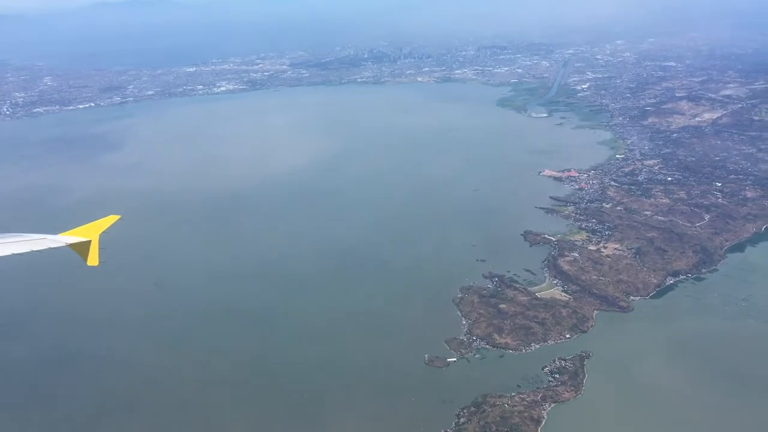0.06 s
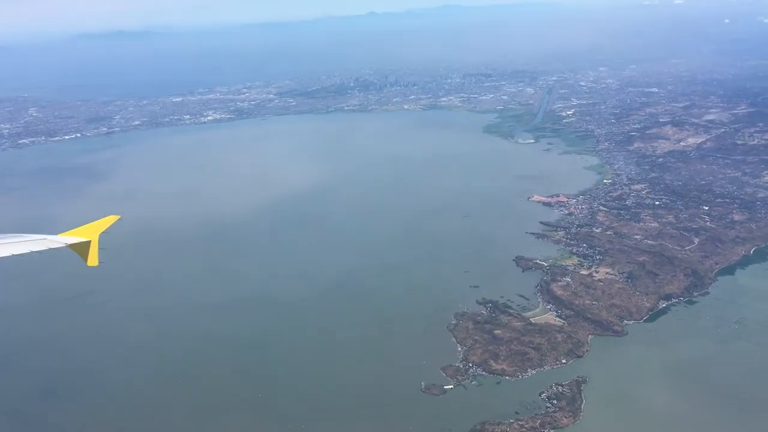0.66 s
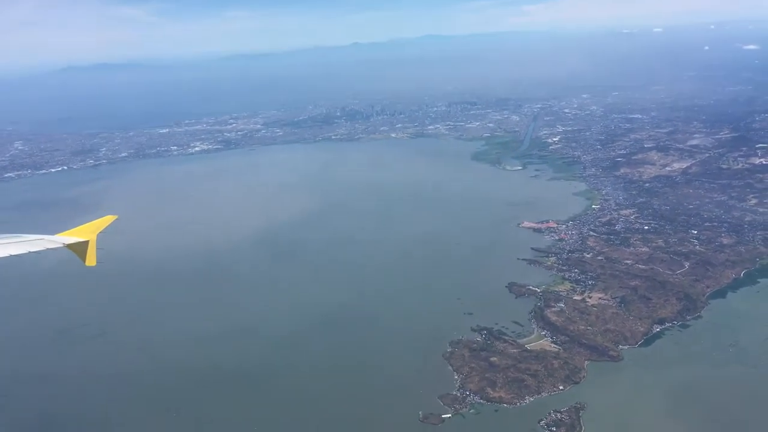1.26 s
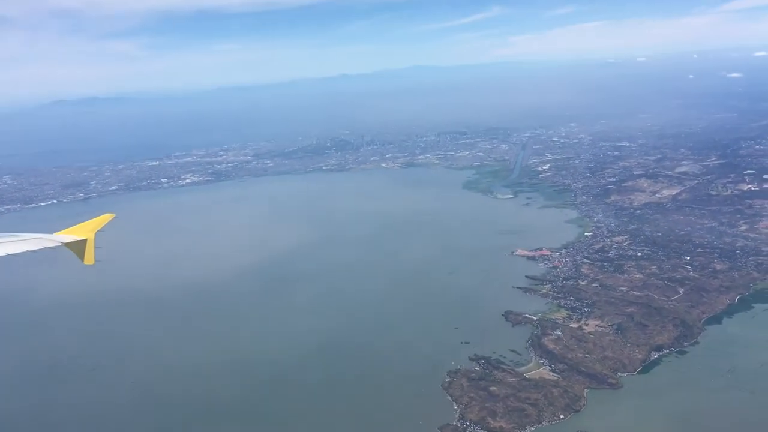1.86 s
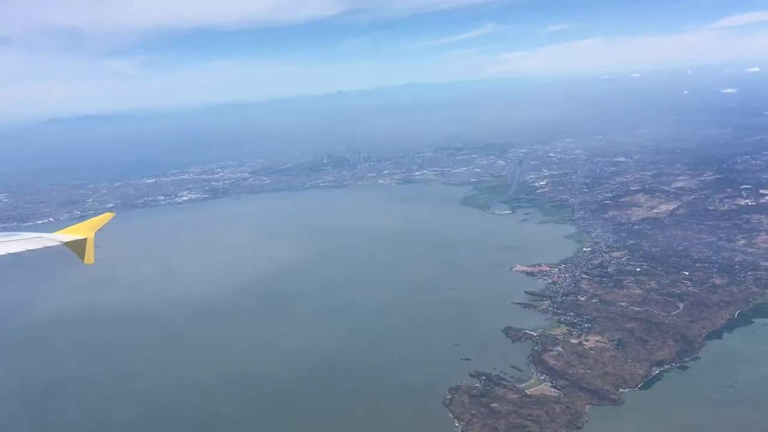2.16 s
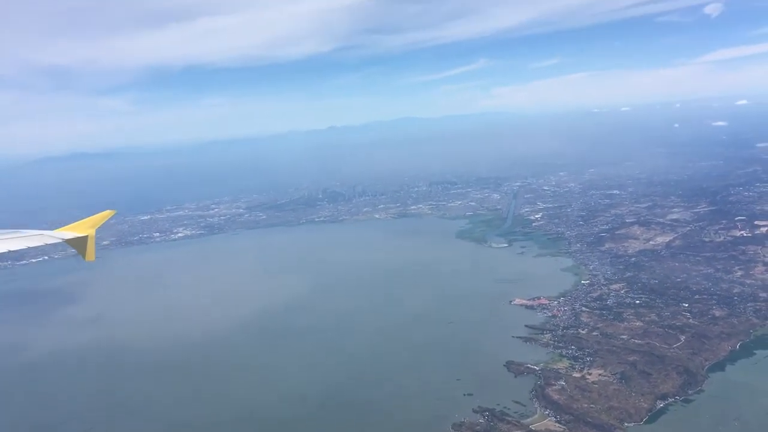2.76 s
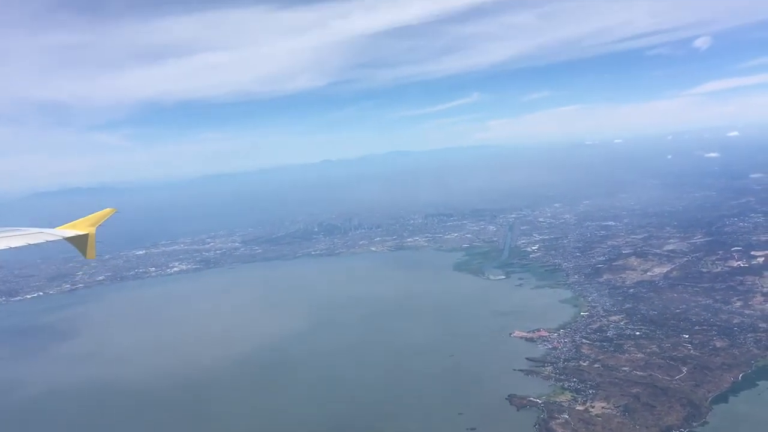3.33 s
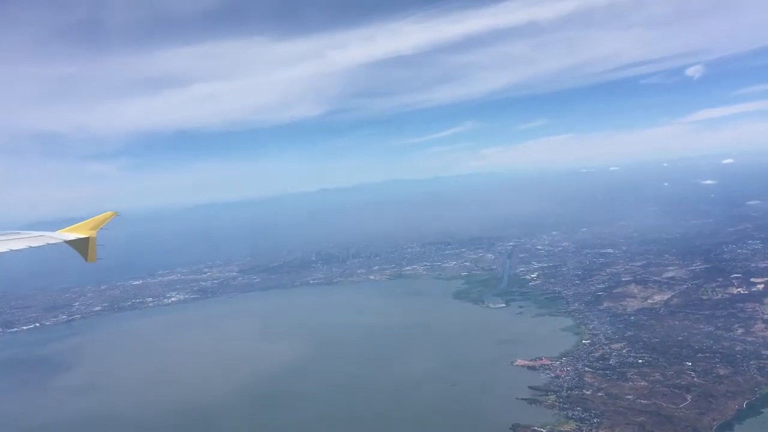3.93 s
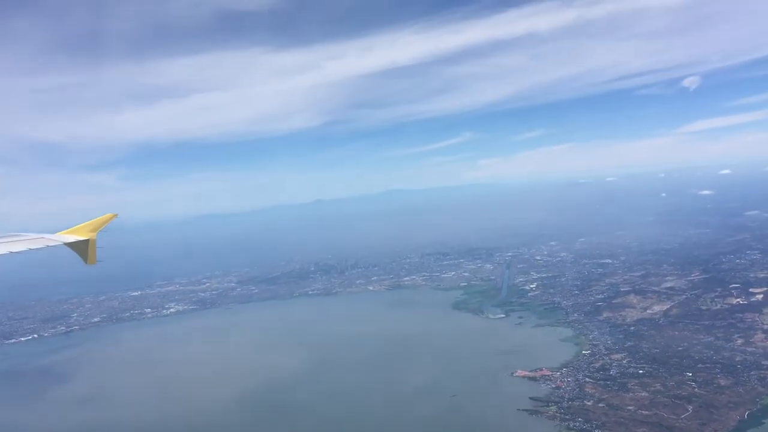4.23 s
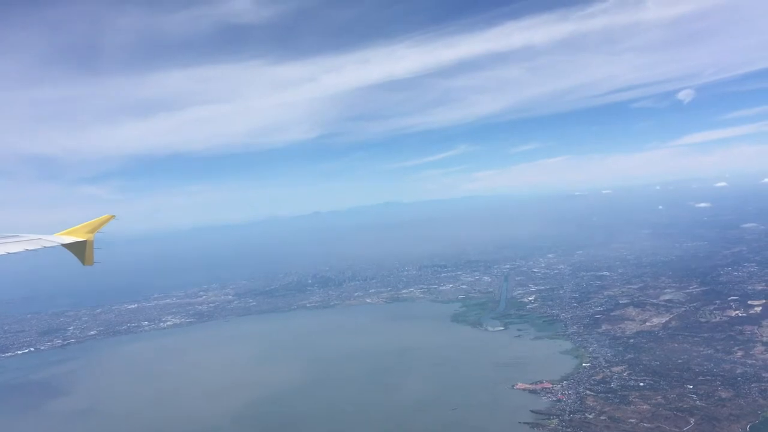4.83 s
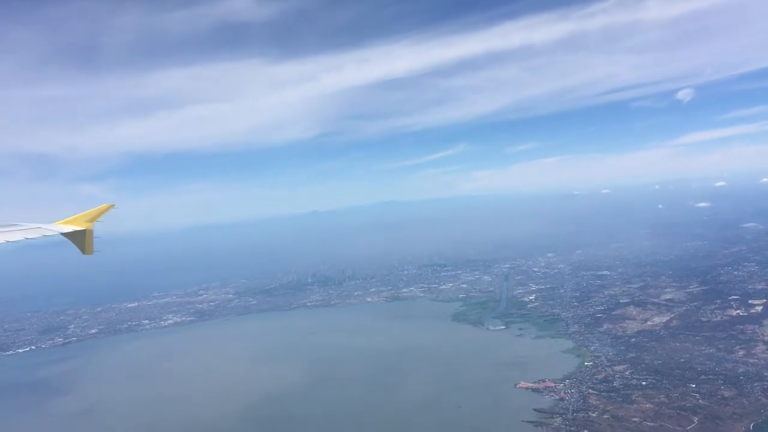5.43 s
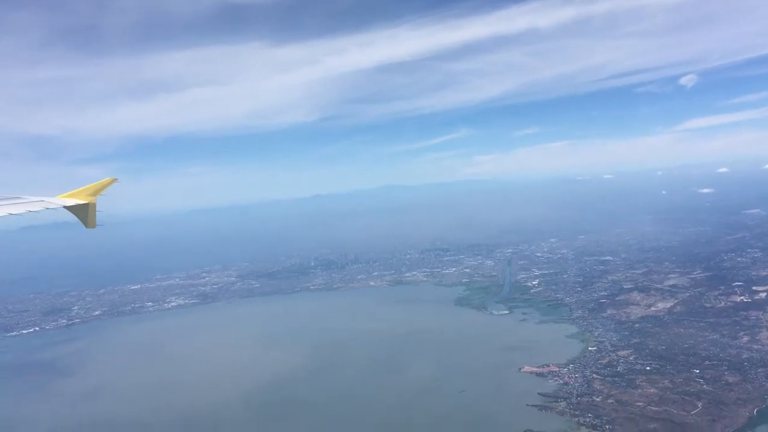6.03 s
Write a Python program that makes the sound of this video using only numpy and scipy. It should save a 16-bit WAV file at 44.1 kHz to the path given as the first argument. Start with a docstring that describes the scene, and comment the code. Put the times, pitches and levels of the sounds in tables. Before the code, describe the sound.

Inside a flying airliner, rushing air and humming engines make a constant low rumble under faint vent hiss.

```python
"""Air rushing along an airliner's fuselage rumbles through the wall at a window seat.
Under that deep bed the engine shafts hum, edging up in pitch, and the engine roar drones
in one cabin resonance that swells three times. On top, the vents hiss and ring in their ducts
and one nozzle whistles softly. A few faint, crisp clicks sound somewhere in the cabin."""
import sys
import numpy as np
from scipy.fft import rfft, irfft, next_fast_len
from scipy.io import wavfile
from scipy.ndimage import map_coordinates

SR = 44100
rng = np.random.default_rng(int(sys.argv[2]) if len(sys.argv) > 2 else 0)


def digitize_waveform(pressure):
    """Quantize a signal to 16-bit integers and store it at the path in sys.argv[1].

    Rows of a 2-D input are taken as channels; values are limited to [-1, 1].
    """
    field = np.atleast_2d(pressure).T
    bounded = np.clip(field, -1, 1)
    quanta = np.round(bounded * 32767).astype(np.int16)
    wavfile.write(sys.argv[1], SR, quanta)


N = 268569

# cues for the faint clicks: start_s, level_db, attack_s
CLICK_CUES = [(3.331, -61, .003), (3.729, -66, .002), (4.005, -59, .002), (4.711, -52.3, .006),
              (5.252, -55.5, .003), (5.328, -52.5, .007), (5.760, -59.5, .004)]
# bright colour of a click: frequency_hz, relative_db
CLICK_COLOUR = [(1500, -32), (4800, -4), (5400, 3), (8800, -1), (10200, -9), (11800, -8), (15500, -14)]
# colour of the vent hiss: frequency_hz, relative_db
HISS_COLOUR = [(600, -19), (1800, -5), (2400, 1.5), (3300, 0), (4500, -7.5), (4950, -14.5), (5300, -13),
               (6900, -12.5), (7700, -17), (9400, -17.5), (10400, -26.5), (11200, -25), (13800, -31.5),
               (15800, -27)]
# resonances of the air ducts: pitch_hz, width_hz, level_db
DUCT_MODES = [(2040, 120, -66.5), (2203, 50, -73), (2368, 50, -68.5), (2483, 70, -67), (2563, 45, -67.5),
              (2807, 150, -66.5), (3304, 20, -74), (3610, 390, -72), (4200, 40, -79), (4510, 70, -79),
              (6394, 100, -85.5), (8400, 350, -82.5), (8920, 300, -76.5), (12150, 900, -84.5)]
# partials of the engine hum: shaft_order, level_db
HUM_PARTIALS = [(1, -32), (2, -35)]
# swells of the engine drone: peak_s, rise_db
DRONE_SWELLS = [(2.55, 3), (3.9, 5.5), (4.8, 7)]
# boomy low resonances of the cabin: pitch_hz, width_hz, level_db
CABIN_MODES = [(51.8, 11, -37.5), (79.3, 12.2, -33), (125.8, 9.9, -37.5), (182.3, 12, -36),
               (229.3, 22, -35), (314.5, 22, -42), (360.4, 24, -47.5)]
# dark colour of the airflow through the wall: frequency_hz, relative_db
RUMBLE_COLOUR = [(18, -34), (30, -27), (46, -3), (105, -2), (230, -2.5), (315, -7), (400, -17),
                 (530, -26.5), (1000, -36.5), (1400, -44), (1850, -49.5), (4000, -79)]


def amp(db):
    """Decibels to gain."""
    return 10 ** (np.asarray(db) / 20)


def unit(x):
    """x at rms 1."""
    return x / np.sqrt(np.mean(x ** 2) + 1e-20)


def wobble(rate):
    """A smooth random curve, rate knots a second."""
    return map_coordinates(rng.standard_normal(N // 100), [np.arange(N) * rate / SR], mode="mirror")


def ramp(start_s, length_s):
    """A rise from 0 to 1 that then holds."""
    return np.clip((np.arange(N) / SR - start_s) / length_s, 0, 1)


def filtered(x, response):
    """x through an EQ curve, given as gain against frequency."""
    size = next_fast_len(N + SR // 2)
    return irfft(rfft(x, size) * response(np.fft.rfftfreq(size, 1 / SR)), size)[:N]


def coloured_noise(colour):
    """Noise of rms 1, shaped by (frequency_hz, relative_db) points."""
    points_hz, db = np.transpose(colour)
    curve = lambda hz: amp(np.interp(np.log(hz + 1), np.log(points_hz), db))
    return unit(filtered(rng.standard_normal(N), curve))


def ringing(pitch_hz, width_hz):
    """Noise of rms 1 in one resonance with steep skirts."""
    peak = lambda hz: (1j * hz * width_hz / (pitch_hz ** 2 - hz ** 2 + 1j * hz * width_hz)) ** 2
    return unit(filtered(rng.standard_normal(N), peak))


def resonances(modes):
    """A bank of resonances kept ringing by turbulence."""
    return sum(amp(db) * ringing(pitch_hz, width_hz) for pitch_hz, width_hz, db in modes)


def clicks(scratch_db=2.0, t60_s=.18):
    """The cabin smears each click into a short, bright, scratchy burst."""
    t = np.arange(N) / SR
    envelope = np.zeros(N)
    for start_s, level_db, attack_s in CLICK_CUES:
        age_s = np.maximum(t - start_s, 0)
        attack = 1 - np.exp(-age_s / attack_s)
        envelope += attack * amp(level_db - 60 * age_s / t60_s)
    scratch = amp(scratch_db * wobble(300))
    return envelope * unit(scratch * coloured_noise(CLICK_COLOUR))


def nozzle_whistle(level_db=-66, lift_db=4):
    """A vent nozzle whistles softly, firms up once and stays there."""
    firm_up = ramp(start_s=3.9, length_s=.6)
    return amp(level_db + lift_db * firm_up) * ringing(pitch_hz=2855, width_hz=92)


def vents(hiss_db=-57, flutter_db=.46):
    """Air jets hiss and ring in the ducts, both fluttering together."""
    flutter = amp(flutter_db * wobble(9.7))
    hiss = amp(hiss_db) * coloured_noise(HISS_COLOUR)
    return flutter * (hiss + resonances(DUCT_MODES))


def engine_hum(cruise_hz=73.12, rise_hz=1.357, drift=.0038, waver_db=2.0):
    """Shaft imbalance sends a wavering hum through the airframe; the engines speed up slightly."""
    shaft_hz = cruise_hz + rise_hz * ramp(start_s=3.0, length_s=1.193)
    turns = np.cumsum(shaft_hz * (1 + drift * wobble(2.003))) / SR
    hum = np.zeros(N)
    for order, level_db in HUM_PARTIALS:
        tone = np.sin(2 * np.pi * (round(order) * turns + rng.random()))
        waver = amp(waver_db * wobble(6))
        hum += amp(level_db) * unit(waver * tone)
    return hum


def engine_drone(level_db=-28.5, swell_s=.55):
    """The engine roar rings in one cabin resonance, swelling and falling back in smooth arches."""
    swell_db = np.zeros(N)
    for peak_s, rise_db in DRONE_SWELLS:
        swell_db += rise_db * np.sin(np.pi * ramp(peak_s - swell_s / 2, swell_s))
    return amp(level_db + swell_db) * ringing(pitch_hz=152.8, width_hz=23)


def airflow(rumble_db=-24, buffet_db=.5):
    """Turbulent air shakes the wall, which passes mostly bass and sets the cabin booming."""
    buffet = amp(buffet_db * wobble(5.6))
    rumble = amp(rumble_db) * coloured_noise(RUMBLE_COLOUR)
    return buffet * (rumble + resonances(CABIN_MODES))


def scene():
    """The mono mix at the seat."""
    return (airflow() + engine_hum() + engine_drone() + vents() + nozzle_whistle() + clicks())[None]


def record(dry):
    """The microphone cuts everything above its band limit."""
    top_hz = 15760
    return np.array([filtered(channel, lambda hz: hz < top_hz) for channel in dry])


dry = scene()
out = record(dry)
digitize_waveform(out)
```